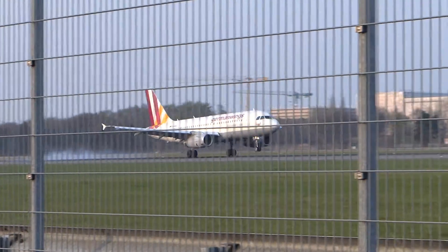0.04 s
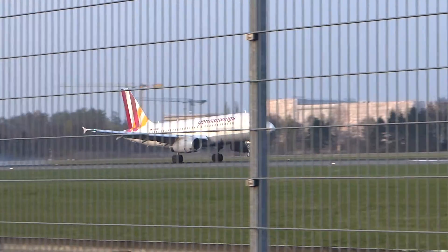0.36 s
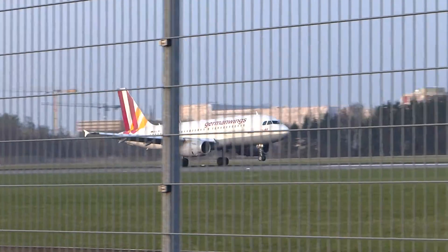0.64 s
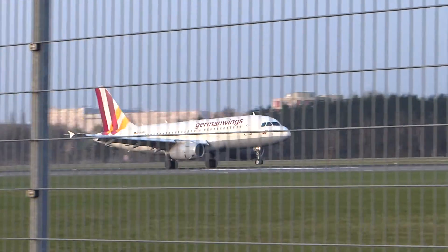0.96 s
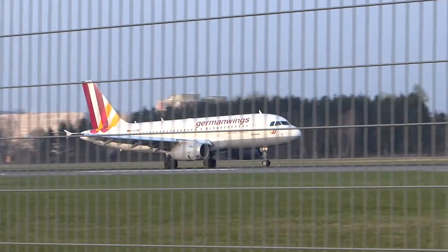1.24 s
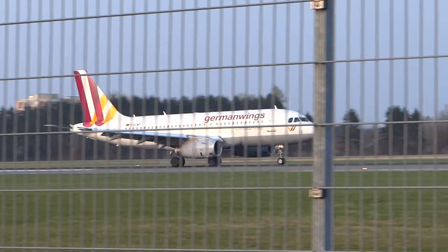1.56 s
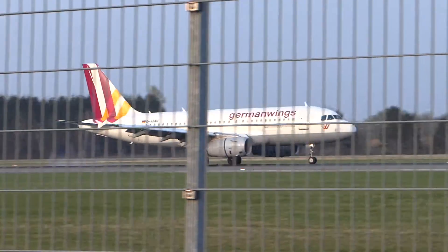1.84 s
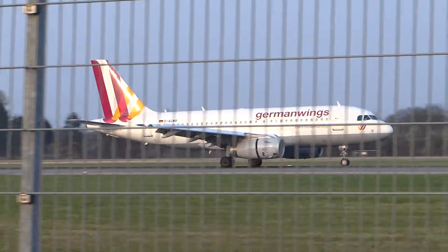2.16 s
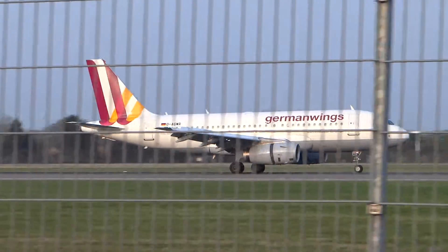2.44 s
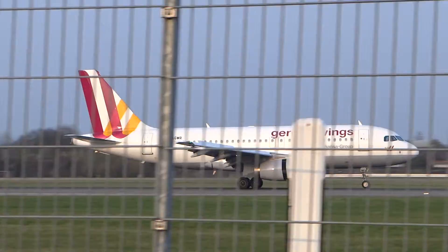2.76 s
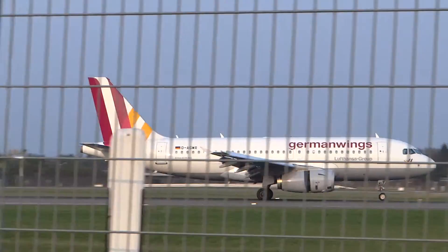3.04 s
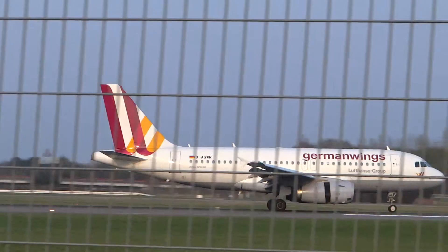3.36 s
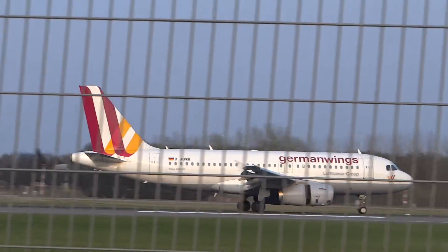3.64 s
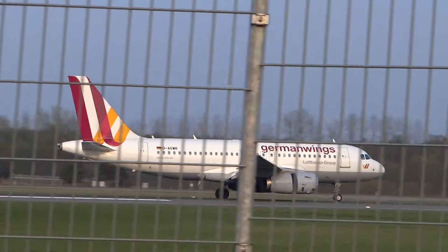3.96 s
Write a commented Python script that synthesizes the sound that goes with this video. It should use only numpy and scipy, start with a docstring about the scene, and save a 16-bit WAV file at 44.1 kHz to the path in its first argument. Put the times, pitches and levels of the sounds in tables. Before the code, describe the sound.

A jet airliner roars loudly throughout as it rolls past after landing, heard outdoors from the fence. A rough howl, probably tyres, fades within the first second. Engine whines slowly sink in pitch, clearest from about 1.3 to 2.8 seconds. From around 2 seconds the slightly flickering roar turns brighter, and the low exhaust rumble swells, peaking near 3 seconds. The sound drifts gently from left to right.

```python
"""A jet airliner, just landed, rolls past with its thrust reversers open, heard from the airport fence.
As it comes abeam of the stereo microphone the exhaust rumbles more and the roar turns brighter,
while the fan and turbine whines sink in pitch. Reflections cut slowly sliding notches into the roar
and moving air makes it flicker. A short rough howl at the start is probably the tyres."""
import sys
import numpy as np
from scipy import signal
from scipy.fft import rfft, irfft
from scipy.io import wavfile

SR = 44100
rng = np.random.default_rng(int(sys.argv[2]) if len(sys.argv) > 2 else 0)


def generate_wav(sig):
    """Save sig (samples, or channels by samples) to the path in sys.argv[1] as 16-bit PCM at SR."""
    pcm = np.round(np.clip(np.atleast_2d(sig).T, -1, 1) * 32767).astype(np.int16)
    wavfile.write(sys.argv[1], SR, pcm)


N = 176400
FRAME, HOP = 1024, 256
BIN_HZ = np.maximum(np.fft.rfftfreq(FRAME, 1 / SR), 1)[:, None]
FRAME_S = np.arange(N // HOP + 2) * HOP / SR
TIME = np.arange(N) / SR
CUT_HZ = 11000

# Exhaust rumble. Each row: frequency in Hz, relative level in dB.
RUMBLE_SPECTRUM = [(15,-34),(30,-25),(45,-7),(65,0.5),(90,2.5),(120,0.5),(180,-1.5),(230,-10),(290,-17),(400,-25),(550,-43),(900,-90)]
# Its rise. Each row: time in seconds, level in dB.
RUMBLE_DB = [(0,-24.5),(.3,-24),(1.1,-23.5),(1.35,-22.5),(2.2,-22),(2.7,-20.5),(3.05,-17.5),(3.5,-19.5),(4,-20.3)]
# A drone inside the rumble. Each row: time in seconds, pitch in Hz, level in dB.
EXHAUST_DRONE = [(0,150,-39.5),(1.2,140,-30.5),(1.8,130,-24),(2.3,148,-25),(2.55,135,-20.5),(3.1,140,-24),(3.5,150,-22.5),(4,145,-25.5)]
# The roar on approach, then abeam of the microphone. Each row: frequency in Hz, relative level in dB.
AHEAD_SPECTRUM = [(100,-11),(300,-7),(550,-9),(700,-8),(900,-2),(1130,-7.5),(1350,-3),(1650,-4.5),(2400,-3),(3000,-10.5),(3500,-11),(4600,-18),(5400,-21.5),(7000,-30.5),(8000,-36),(11000,-49)]
ABEAM_SPECTRUM = [(100,-32),(300,-16.5),(470,-15.5),(620,-8.5),(820,-0.5),(1050,-5),(1250,0),(1470,-5),(1800,4),(2550,-1.5),(2900,-8),(4200,-8.5),(6000,-13),(7200,-24),(8700,-42.5),(11000,-47.5)]
# The roar's course. Each row: time in seconds, level in dB before boosts and notches.
ROAR_DB = [(0,-22.5),(.5,-19.5),(1.0,-19.5),(1.3,-18.5),(1.9,-18.5),(2.5,-18.5),(3.0,-17.5),(3.5,-17.5),(4,-17)]
# Its tone. Each row: time in seconds, low-middle boost in dB, top boost in dB.
ROAR_BOOSTS = [(0,6.5,8),(.5,2.5,5.5),(.8,-1,-1),(1.4,-2,1),(2.0,-2,0.5),(2.3,1,5),(2.7,1.5,3.5),(3.0,1,-2),(3.5,1.5,0.5),(4,2,-4)]
# Reflection notches and the bright ridges between them. Each row: peak time in seconds,
# half length in seconds, frequency at the peak in Hz, half width in Hz, gain in dB.
REFLECTION_NOTCHES = [(.1,0.76,2860,190,-7.5),(1.05,0.65,2770,116,-14),(2.3,0.96,2653,86,-11.5),(1.66,1.02,3780,130,-10),(0.78,1,4830,140,-8.5),(2.1,0.68,4380,92,-12),(1.45,1.13,5860,195,-15),(1.4,0.58,6780,110,-5),(3.18,1.46,3260,165,-8.5),(3,0.98,3820,140,-5),(2.8,0.52,4970,120,-7),(3.63,0.77,4660,230,-14),(4.1,0.77,5380,150,-12),(3.2,.9,6560,150,-9),(2.4,1.9,7720,170,-8),(3.8,.5,9100,130,-6)]
REFLECTION_RIDGES = [(0.24,0.63,3690,240.7,3.5),(.9,.5,1350,89.5,2),(1.3,0.74,5900,150,2),(1.5,.9,7100,130,-2),(2.1,.4,5900,220,0),(2.53,0.2,6900,240,8),(4.04,0.27,2550,130,10.5),(3.58,.7,3544,120.4,5.5),(3.8,.6,5160,140.4,4),(3.8,0.43,6940,230,8.5),(3.7,0.74,7780,160,9)]
# Fan and turbine whines. Each row: time in seconds, pitch in Hz.
FAN_PITCH = [(0,2022),(.9,1994),(1.6,1941),(2.3,1860),(3.2,1793),(4,1763)]
TURBINE_PITCH = [(0,5250),(.45,5120),(1.0,4790),(1.65,4730),(2.05,4605),(2.35,4515),(2.7,4400),(3.2,4270),(4,4130)]
# Fan, turbine and a higher stage that comes and goes. Each row: time in seconds, level in dB.
FAN_DB = [(0,-34),(.8,-31.5),(1.35,-26),(1.9,-26.5),(2.5,-31),(3.2,-37),(4,-30)]
TURBINE_DB = [(0,-54),(.55,-47),(.9,-51),(1.45,-49),(1.65,-40.5),(1.9,-38),(2.15,-45),(2.5,-35.5),(2.8,-38),(3.15,-46),(4,-52)]
HIGH_STAGE_DB = [(0,-66),(.6,-62),(.9,-52),(1.2,-65),(1.65,-65),(1.95,-52),(2.3,-66),(4,-68)]
# Left minus right microphone. Each row: frequency in Hz, starting balance in dB, abeam balance in dB.
BALANCE = [(60,-1.5,-7.5),(170,-0.5,-6),(350,0,1),(600,1.5,3),(1000,4.5,-2.8),(2000,0.8,-1.5),(5000,.4,-1.6),(10000,5,1)]
# Sound that arrives scattered. Each row: frequency in Hz, level against the direct sound in dB.
SCATTER_DB = [(60,-22),(150,-22),(300,-12),(550,-10),(1100,-16.5),(2200,-21),(5000,-12.5),(10000,-9.5)]
# The left microphone's lead. Each row: frequency in Hz, phase in radians.
LEFT_LEAD = [(60,0),(250,.05),(520,0.25),(1500,0.45),(2100,-0.27),(4400,-0.24),(7000,-0.13),(10000,0)]


def undb(db):
    """Decibels to gain."""
    return 10 ** (np.asarray(db) / 20)


def curve(rows, t, column=1):
    """One column of a table, joined by straight lines in time."""
    rows = np.array(rows, float)
    return np.interp(t, rows[:, 0], rows[:, column])


def colour(rows, hz, column=1):
    """One column of a table, joined by straight lines in log frequency."""
    rows = np.array(rows, float)
    return np.interp(np.log(hz), np.log(rows[:, 0]), rows[:, column])


def bell(x, centre, width):
    """A smooth hump of height 1."""
    return np.exp(-((x - centre) / width) ** 2)


def wander(rate_hz):
    """Smooth random motion with a spread of 1, one value a frame."""
    size = 4096
    lowpass = bell(np.fft.rfftfreq(size, HOP / SR), 0, rate_hz)
    x = irfft(rfft(rng.standard_normal(size)) * lowpass)
    return (x / x.std())[:len(FRAME_S)]


def to_spectra(x):
    """Sound to short overlapping spectra."""
    return signal.stft(x, nperseg=FRAME, noverlap=FRAME - HOP)[2]


def to_sound(spectra):
    """Short overlapping spectra to sound."""
    return signal.istft(spectra, nperseg=FRAME, noverlap=FRAME - HOP)[1][..., :N]


def noise(gain_at):
    """Two unrelated noises (direct, scattered) of rms 1, shaped by a gain at each frequency."""
    hz = np.maximum(np.fft.rfftfreq(N, 1 / SR), 1)
    x = irfft(rfft(rng.standard_normal((2, N))) * gain_at(hz), N)
    return x / x.std(axis=1, keepdims=True)


def whine(hz, db, half_width_hz):
    """A tone that follows a pitch curve, smeared into a narrow band by turbulence."""
    phase = 2 * np.pi * np.cumsum(hz) / SR
    skirt = lambda f: 1 / (1 + (f / half_width_hz) ** 2)
    return undb(db) * (noise(skirt) * np.cos(phase) + noise(skirt) * np.sin(phase))


def exhaust_rumble():
    """The reversed exhaust billows and drones, louder as the engines come abeam of the microphone."""
    billow_db = 0.25 * np.interp(TIME, FRAME_S, wander(rate_hz=14))
    body = noise(lambda hz: undb(colour(RUMBLE_SPECTRUM, hz)))
    drone = whine(curve(EXHAUST_DRONE, TIME), curve(EXHAUST_DRONE, TIME, column=2), half_width_hz=42.6)
    return body * undb(curve(RUMBLE_DB, TIME) + billow_db) + drone


def interference(rows, slide_per_s=-0.035):
    """Reflections meet the direct sound: notches or ridges, in dB, slide down as the aircraft moves."""
    total_db = 0
    for peak_s, half_length_s, hz, half_width_hz, db in rows:
        centre_hz = hz * np.exp(slide_per_s * (FRAME_S - peak_s))
        total_db += db * bell(FRAME_S, peak_s, half_length_s) * bell(BIN_HZ, centre_hz, half_width_hz)
    return total_db


def air_turbulence():
    """Air moving between runway and fence: all bands swell, each flickers, the treble most. In dB."""
    centres_hz = np.linspace(0, CUT_HZ, num=36)
    flicker = sum(bell(BIN_HZ, hz, centres_hz[1] * 1.03) * wander(rate_hz=14.7) for hz in centres_hz)
    treble = np.minimum(BIN_HZ / 5000, 1)
    swell_db = 0.1 * wander(rate_hz=9)
    shimmer_db = 0.5 * treble * wander(rate_hz=30)
    return swell_db + flicker * (0.6 + 0.4 * treble) + shimmer_db


def engine_roar(turn_s=2.33, turn_width_s=0.45):
    """Broad engine noise whose colour turns with the angle from microphone to aircraft."""
    abeam = 0.5 + 0.5 * np.tanh((FRAME_S - turn_s) / turn_width_s / 2)
    db = (1 - abeam) * colour(AHEAD_SPECTRUM, BIN_HZ) + abeam * colour(ABEAM_SPECTRUM, BIN_HZ)
    db -= 10 * np.log10(np.mean(undb(db) ** 2, axis=0))  # equal power at every angle
    db += curve(ROAR_DB, FRAME_S)
    low_middle = bell(np.log2(BIN_HZ / 460), 0, 0.73)  # width in octaves
    top = 0.5 + 0.5 * np.tanh((BIN_HZ - 7900) / 900)
    db += curve(ROAR_BOOSTS, FRAME_S) * low_middle + curve(ROAR_BOOSTS, FRAME_S, column=2) * top
    db += interference(REFLECTION_NOTCHES) + interference(REFLECTION_RIDGES) + air_turbulence()
    return to_sound(to_spectra(rng.standard_normal((2, N))) * undb(db))


def blade_whines(high_stage_ratio=1.318):
    """Fan and turbine tones sink as the aircraft closes in and slows."""
    turbine_hz = curve(TURBINE_PITCH, TIME)
    fan = whine(curve(FAN_PITCH, TIME), curve(FAN_DB, TIME), half_width_hz=41)
    turbine = whine(turbine_hz, curve(TURBINE_DB, TIME), half_width_hz=32)
    high_stage = whine(turbine_hz * high_stage_ratio, curve(HIGH_STAGE_DB, TIME), half_width_hz=32)
    return fan + turbine + high_stage


def tyre_howl(hz=1001.0, peak_s=0.28, half_length_s=0.44):
    """A brief rough howl from the runway, probably the tyres as the wheels spin up."""
    return whine(np.full(N, hz), db=-24, half_width_hz=113) * bell(TIME, peak_s, half_length_s)


def scene(swing_s=1.6):
    """From the fence the aircraft drifts left to right; part of its sound arrives scattered."""
    direct, scattered = to_spectra(exhaust_rumble() + engine_roar() + blade_whines() + tyre_howl())
    swing = 1 - np.exp(-FRAME_S / swing_s)
    balance_db = (1 - swing) * colour(BALANCE, BIN_HZ) + swing * colour(BALANCE, BIN_HZ, column=2)
    sides = np.array([1, -1])[:, None, None]  # left, right
    gains = undb(sides * balance_db / 2)
    phase_shift = np.exp(0.5j * sides * colour(LEFT_LEAD, BIN_HZ))
    arriving = direct + sides * undb(colour(SCATTER_DB, BIN_HZ)) * scattered
    return to_sound(gains / gains.mean(axis=0) * phase_shift * arriving)


def record(dry):
    """The camera behind the microphone cuts the top steeply."""
    return signal.sosfilt(signal.ellip(12, 0.1, 80, CUT_HZ, fs=SR, output="sos"), dry)


dry = scene()
out = record(dry)
generate_wav(out)
```